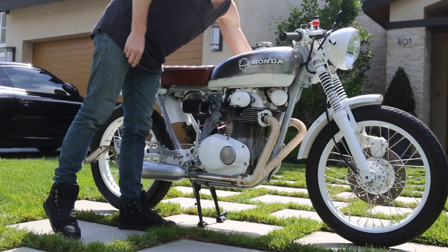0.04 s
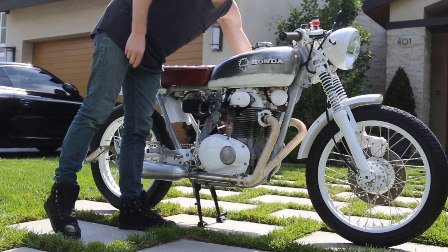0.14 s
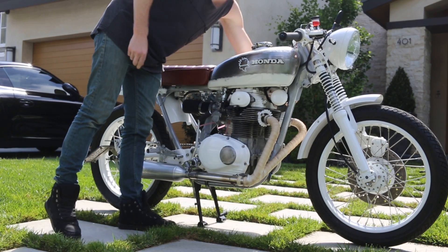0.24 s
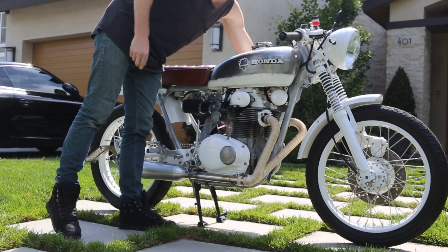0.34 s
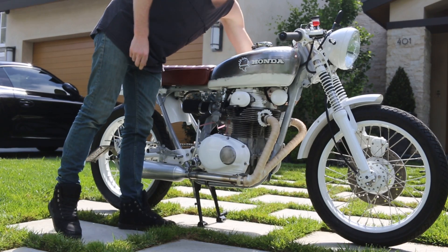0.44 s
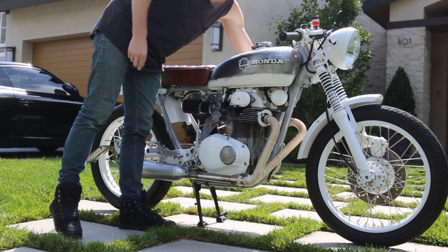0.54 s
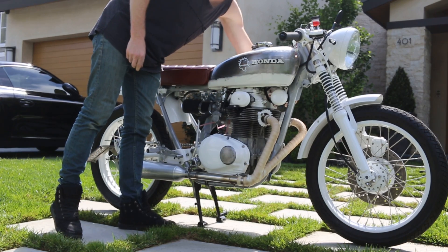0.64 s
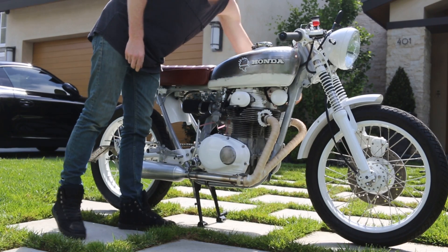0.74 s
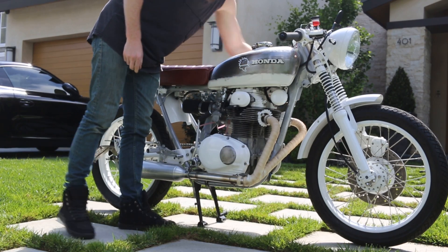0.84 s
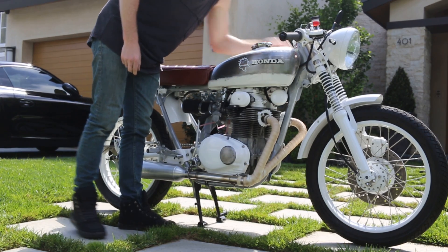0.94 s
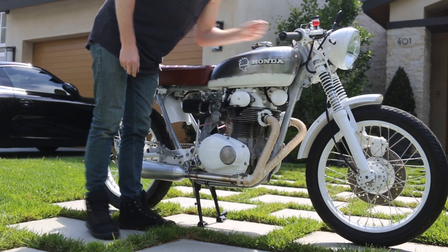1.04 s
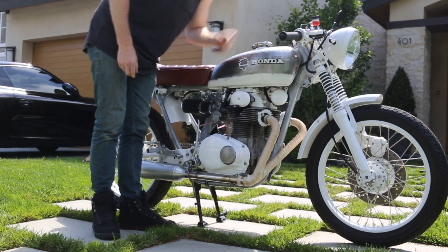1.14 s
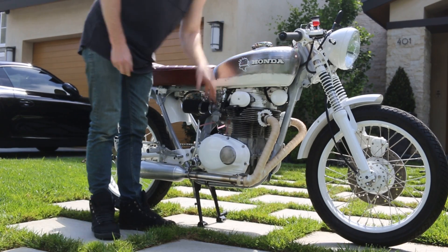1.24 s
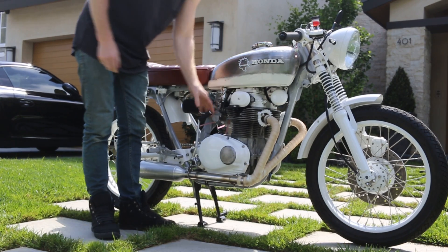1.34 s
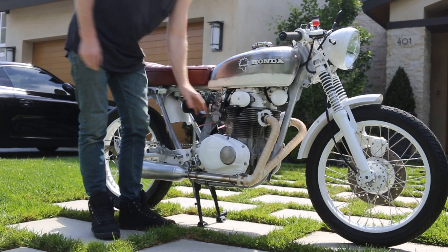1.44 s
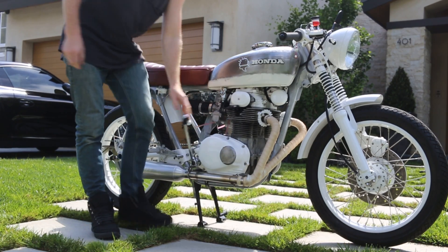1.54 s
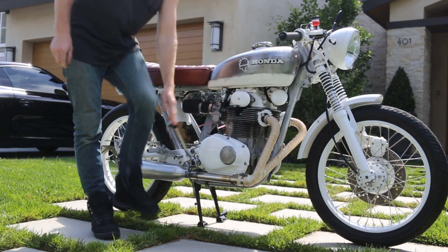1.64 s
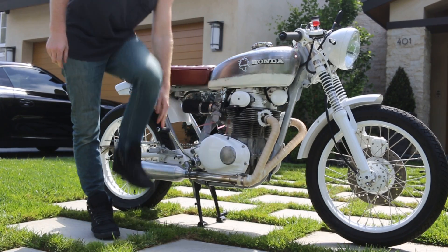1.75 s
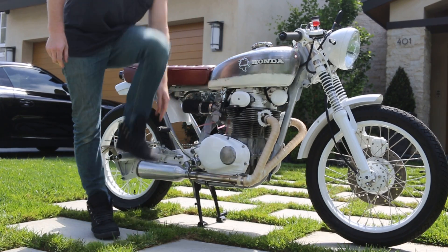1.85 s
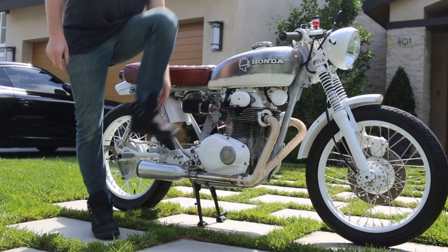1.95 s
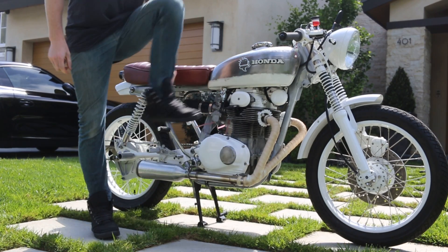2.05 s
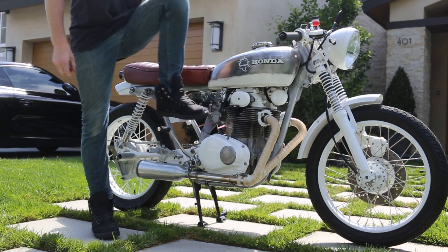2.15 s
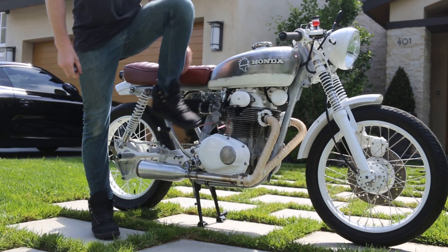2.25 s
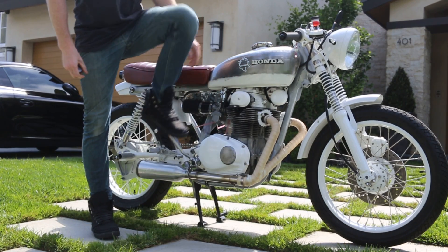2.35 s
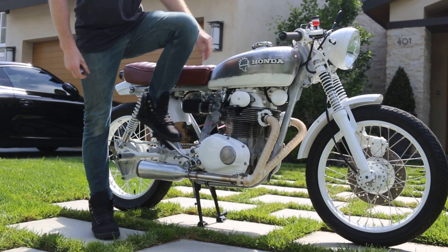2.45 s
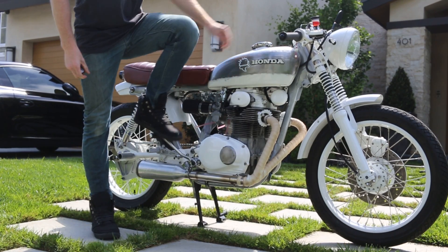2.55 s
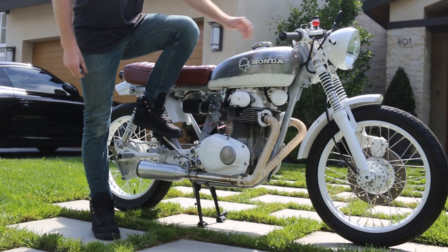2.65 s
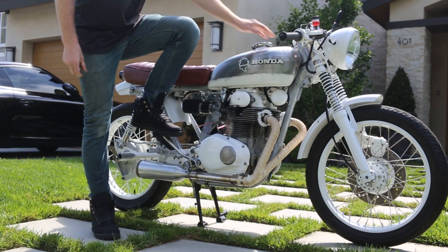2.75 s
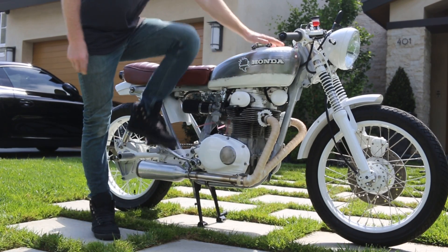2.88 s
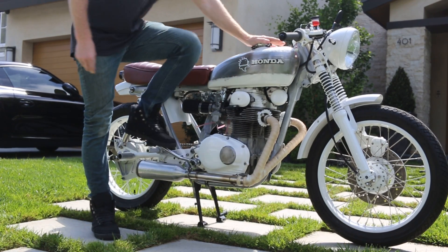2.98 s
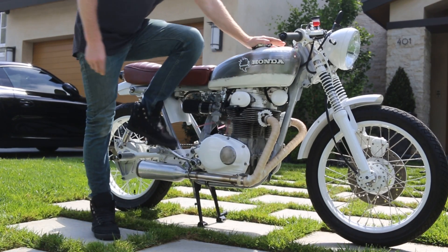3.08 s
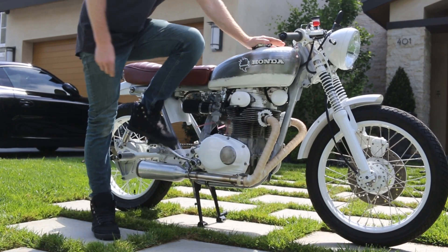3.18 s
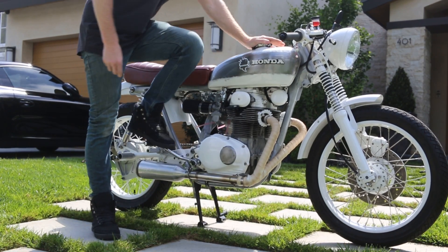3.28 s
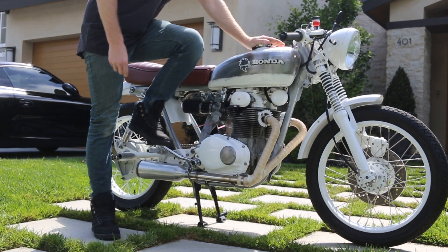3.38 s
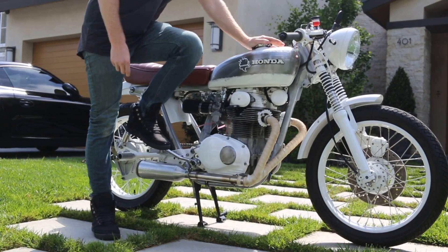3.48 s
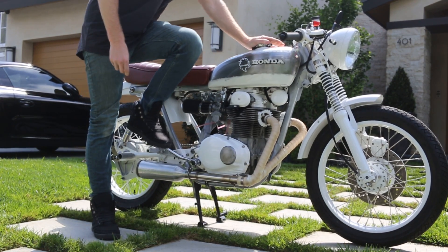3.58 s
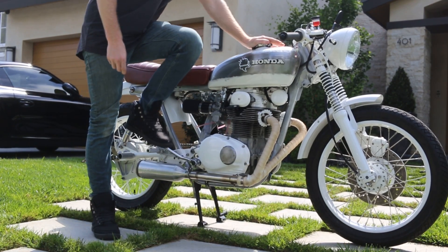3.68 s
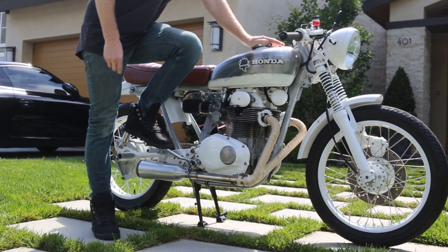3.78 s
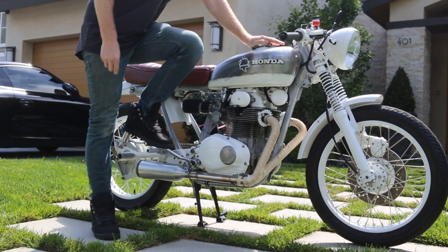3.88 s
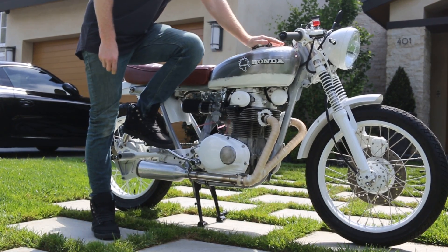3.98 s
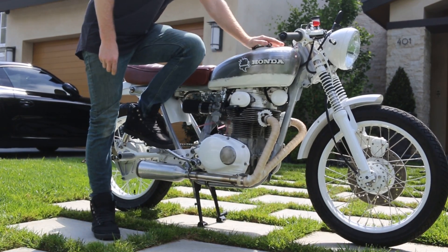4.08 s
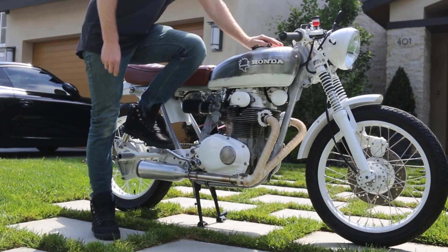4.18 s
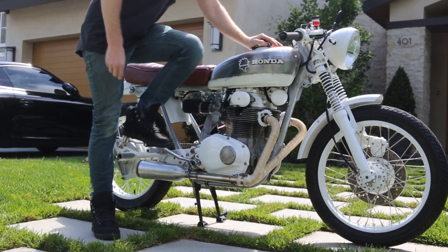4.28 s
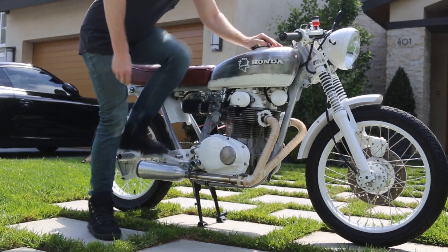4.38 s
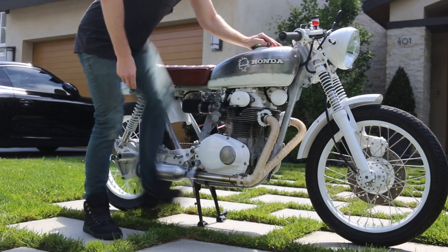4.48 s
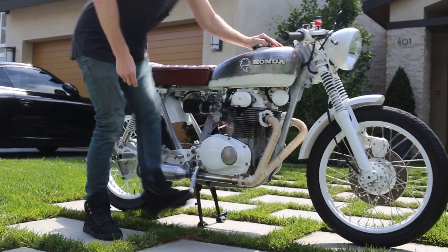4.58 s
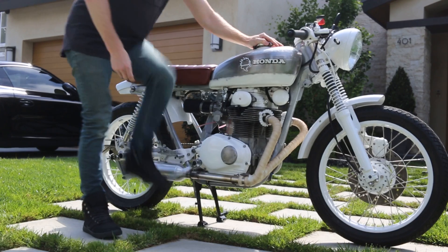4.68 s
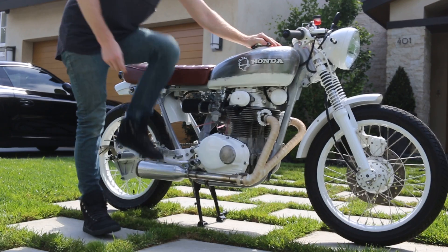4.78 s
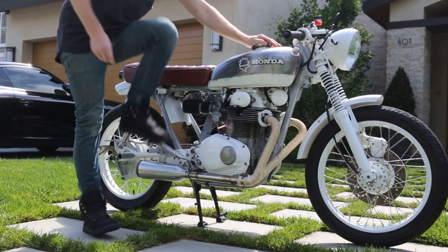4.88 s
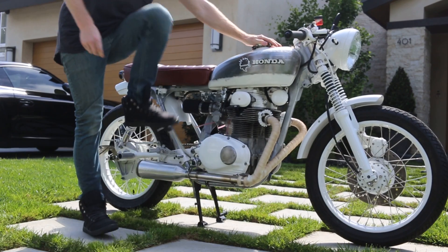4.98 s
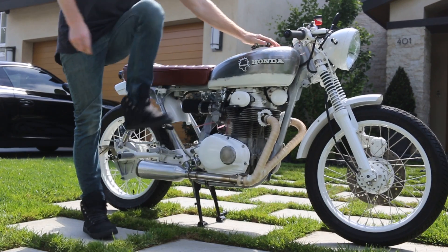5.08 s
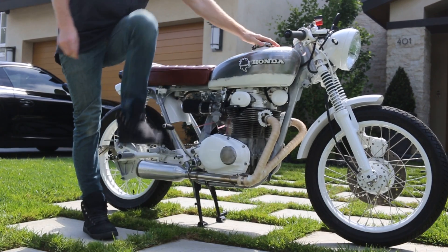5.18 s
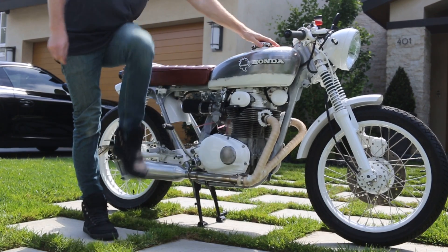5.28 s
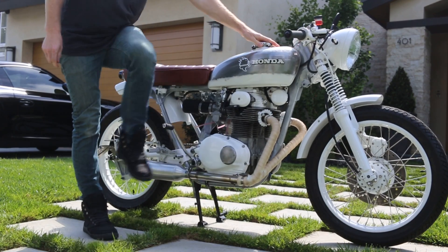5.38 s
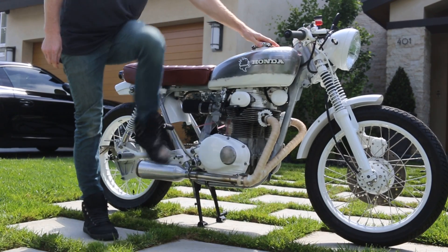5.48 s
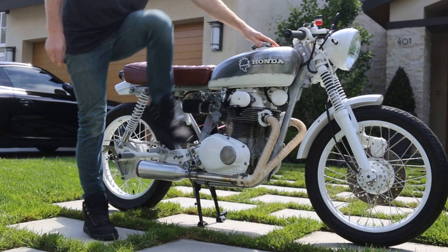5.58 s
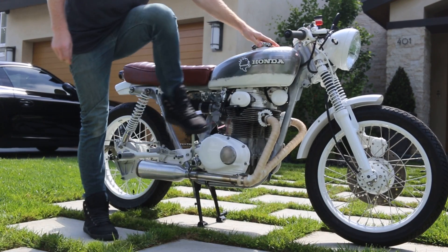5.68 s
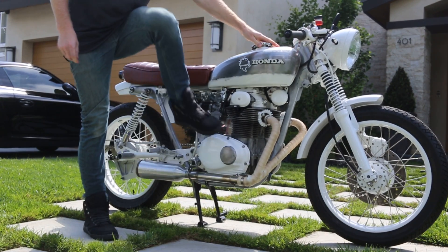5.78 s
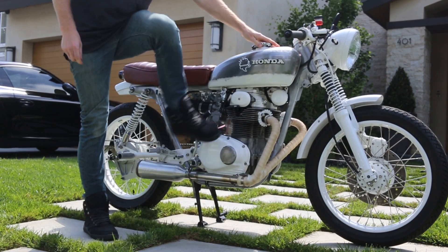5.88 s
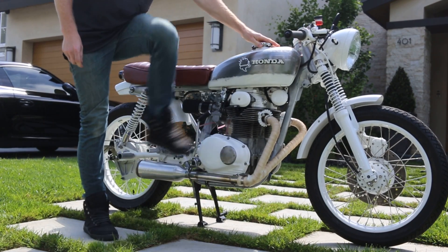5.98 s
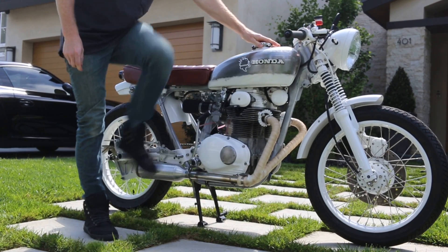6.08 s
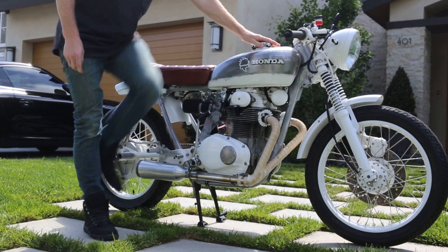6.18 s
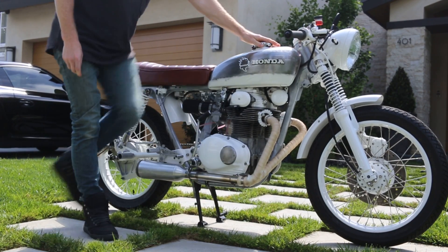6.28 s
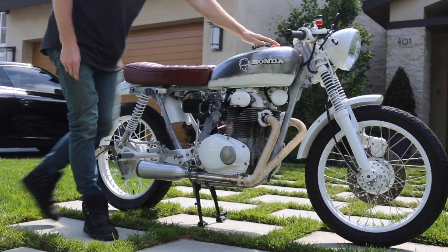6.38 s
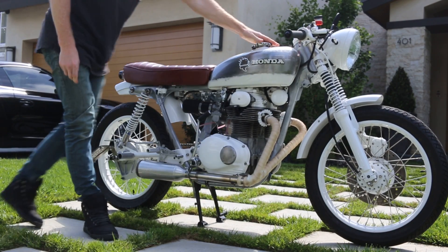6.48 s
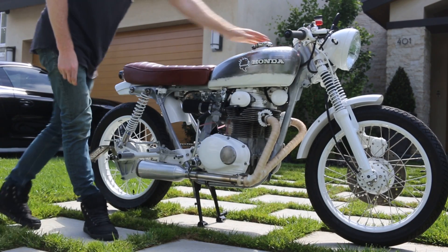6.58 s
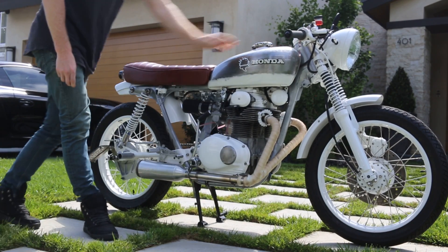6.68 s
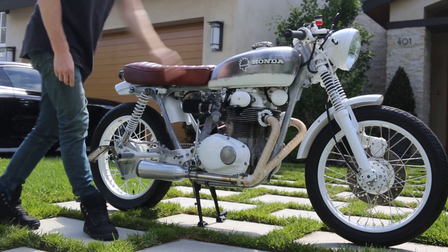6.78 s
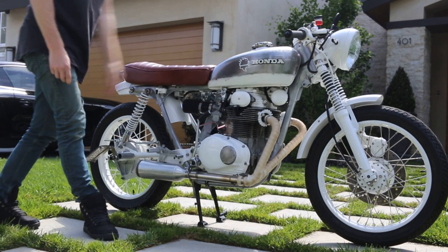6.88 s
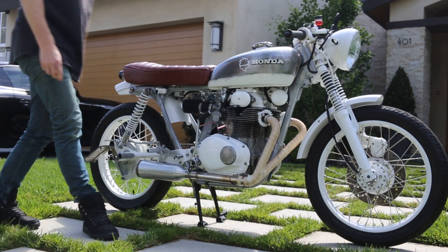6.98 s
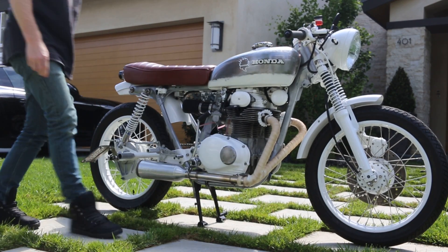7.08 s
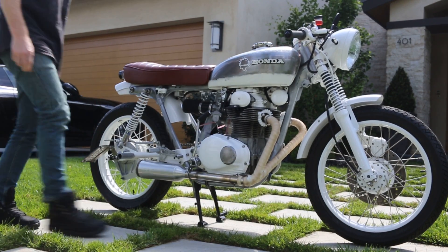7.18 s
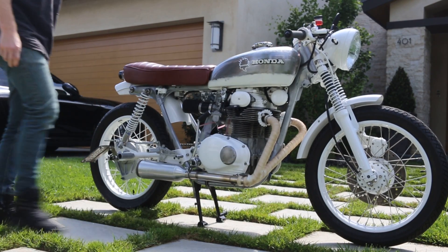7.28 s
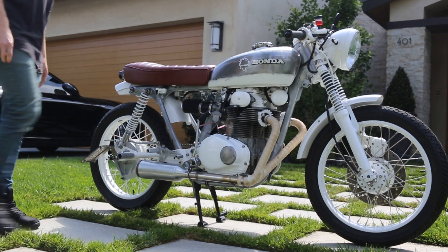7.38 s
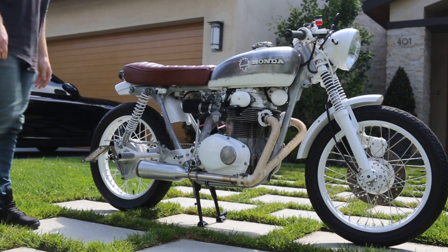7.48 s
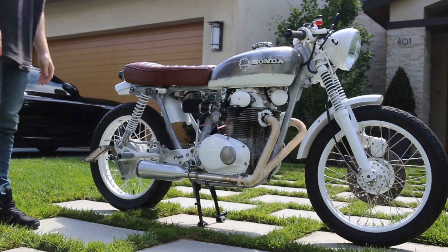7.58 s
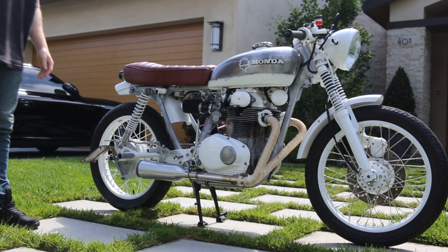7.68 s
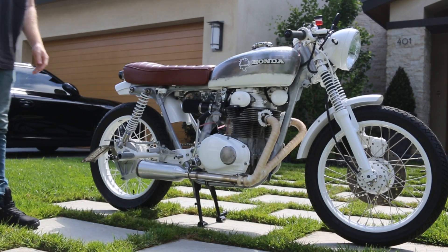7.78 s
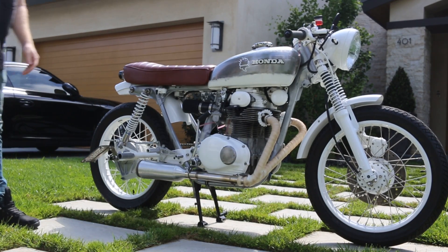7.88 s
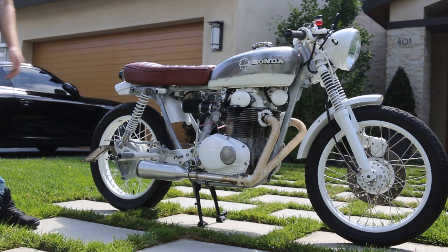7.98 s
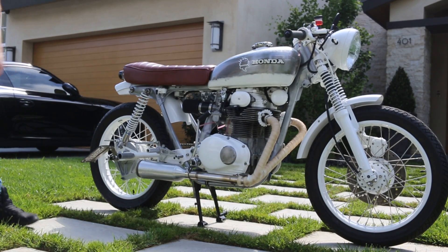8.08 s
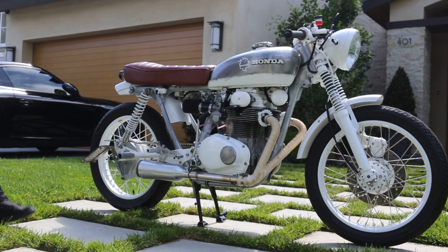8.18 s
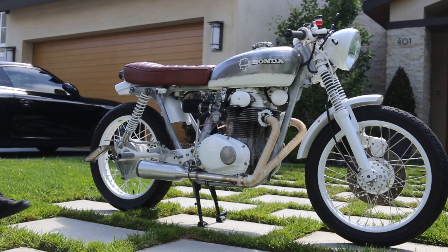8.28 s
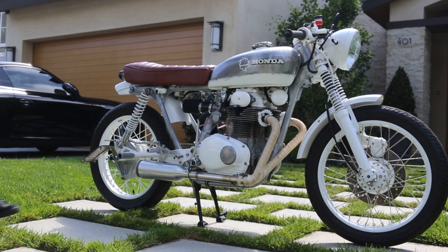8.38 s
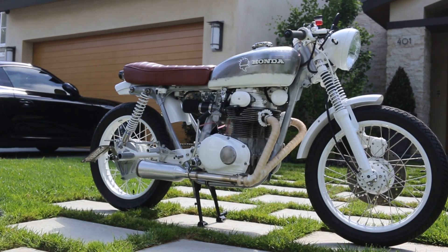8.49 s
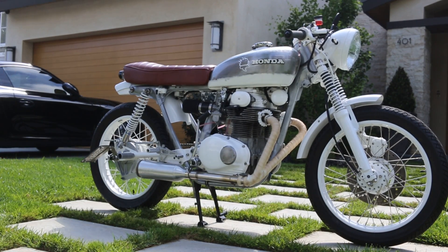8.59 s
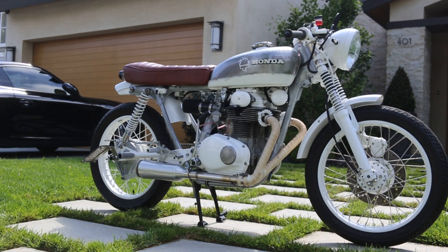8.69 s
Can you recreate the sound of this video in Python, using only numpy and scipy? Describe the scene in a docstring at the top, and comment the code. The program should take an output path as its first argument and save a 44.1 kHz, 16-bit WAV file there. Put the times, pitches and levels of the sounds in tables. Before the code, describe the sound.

Close microphone in a driveway. Over faint distant traffic and a bird whistle, a motorcycle key snaps, jeans rustle, and a metal kick lever clacks with dull low thuds. One kick sends the starter ratchet buzzing as the twin engine catches, flares briefly, then settles into a low, uneven idle with tapping valves and hissing chain until the end.

```python
"""Driveway: an old twin-cylinder motorcycle is kick started over distant traffic and a bird.
The key clicks, the lever is folded out and eased against compression: noise bursts, damped modes, low thuds.
One kick fires the engine; the starter pawl buzzes as a train of tooth snaps until the lever returns.
Then a loping idle: pulses in resonant pipes, valve knocks and gear churn, a ticking rocker, surging chain hiss."""
import sys
import numpy as np
from scipy import signal
from scipy.fft import rfft, irfft, next_fast_len
from scipy.io import wavfile
from scipy.ndimage import uniform_filter1d, map_coordinates

SR = 44100
rng = np.random.default_rng(int(sys.argv[2]) if len(sys.argv) > 2 else 0)


def generate_wav(sig):
    """Save sig (samples, or channels by samples) to the path in sys.argv[1] as 16-bit PCM at SR."""
    pcm = np.round(np.clip(np.atleast_2d(sig).T, -1, 1) * 32767).astype(np.int16)
    wavfile.write(sys.argv[1], SR, pcm)


N = 385434


def amp(db):
    """Amplitude factor of a level in dB."""
    return 10 ** (np.asarray(db) / 20)


def unit(x):
    """x scaled to rms 1."""
    return x / np.sqrt(np.mean(x ** 2) + 1e-20)


def along(points, hz):
    """(f/Hz, value) points interpolated on a log frequency axis."""
    f, v = np.transpose(points)
    return np.interp(np.log(hz + 1), np.log(f + 1), v)


def wobble(rate_hz):
    """Smooth random curve with rate_hz knots a second."""
    knots = rng.standard_normal(int(N * rate_hz / SR) + 4)
    return map_coordinates(knots, [np.arange(N) * rate_hz / SR])


def filtered(x, response):
    """x times a complex response of frequency."""
    m = next_fast_len(len(x) + SR // 2)
    return irfft(rfft(x, m) * response(np.fft.rfftfreq(m, 1 / SR)), m)[:len(x)]


def noise(spectrum, size=N):
    """Noise of rms 1, coloured by (f/Hz, level/dB) points."""
    return unit(filtered(rng.standard_normal(size), lambda hz: amp(along(spectrum, hz))))


def resonances(modes, f):
    """Causal response of (f/Hz, width/Hz, level/dB) modes with alternating signs."""
    return sum((-1) ** k * amp(db) * 1j * f * width / (centre * centre - f * f + 1j * f * width)
               for k, (centre, width, db) in enumerate(modes))


def ringing(excitation, modes):
    """Excitation coloured by resonances, at its former rms."""
    return unit(filtered(excitation, lambda f: resonances(modes, f))) * np.std(excitation)


def struck(modes):
    """Decaying sines of (f/Hz, level/dB, t60/s) modes, each at a slightly new strength."""
    t = np.arange(SR // 3) / SR
    scatter_db = rng.normal(0, 1.2, len(modes))
    return sum((-1) ** k * amp(db + scatter_db[k] - 60 * t / t60) * np.sin(2 * np.pi * hz * t)
               for k, (hz, db, t60) in enumerate(modes))


def add(track, s, sound):
    """Mix a sound into a track at time s."""
    part = track[max(round(s * SR), 0):][:len(sound)]
    part += sound[:len(part)]


def strikes(rows):
    """Envelope of sudden blows (t/s, level/dB, t60/s) that die away; their powers add."""
    power, t = np.zeros(N), np.arange(SR // 5) / SR
    for s, db, t60, *_ in rows:
        blow = amp(db - 60 * t / t60) * (1 - np.exp(-t / 0.00026))
        add(power, s, blow ** 2)
    return np.sqrt(power)


# distant traffic spectrum: f/Hz, level/dB
TRAFFIC_SPECTRUM = [(12, -34), (22, -2), (40, -4), (75, -5.5), (120, -0.5), (160, -11.5), (280, -14.5),
                    (400, -22), (550, -24), (1000, -24.5), (1600, -27.5), (4000, -34.5), (5700, -41.5),
                    (15800, -45.5)]


def traffic():
    """Distant traffic: low-weighted noise whose bass swells a little."""
    rumble = noise(TRAFFIC_SPECTRUM) * amp(-42.5)
    bass = filtered(rumble, lambda hz: 1 / (1 + (hz / 200) ** 2))
    return rumble + bass * (amp(wobble(6.3)) - 1)


# bird notes: t/s, length/s, start f/Hz, end f/Hz, level/dB
BIRD_NOTES = [(1.002, 0.11, 6800, 6600, -60), (1.14, .34, 5740, 4110, -52), (3.822, .11, 4500, 4210, -54.5),
              (3.919, 0.19, 4210, 3720, -54.5)]
SLIDE_POWER, SWELL_POWER = 2.4, 0.84  # bend of the slide, roundness of the swell
FLUTTER_SHARE = 0.0083


def bird():
    """Slightly husky whistles: swelling sines that slide down and level off, with pitch flutter."""
    track, flutter = np.zeros(N), 1 + FLUTTER_SHARE * wobble(400)
    for s, length, start_hz, end_hz, db in BIRD_NOTES:
        u = np.linspace(0, 1, round(length * SR))
        slide_hz = end_hz + (start_hz - end_hz) * (1 - u) ** SLIDE_POWER
        hz = slide_hz * flutter[round(s * SR):][:len(u)]
        swell = np.abs(np.sin(np.pi * u)) ** SWELL_POWER
        add(track, s, amp(db) * swell * np.sin(2 * np.pi * np.cumsum(hz) / SR))
    return track


# cloth spectrum: f/Hz, level/dB
JEANS_SPECTRUM = [(2350, -25), (4000, 2), (5650, -3), (8650, 3.5), (9960, 4.5), (12100, -2), (15500, -18)]
# strokes of cloth and boot: peak t/s, level/dB, rise/s, fall/s
RUB_STROKES = [(.545, -47, .025, 0.027), (1.6, -63, .05, 0.041), (2.12, -55.5, 0.26, 0.07),
               (3.0, -66, .04, 0.11), (3.42, -67, .12, .05)]


def jeans():
    """Jeans rub as the leg swings: bright noise in uneven bell-shaped strokes."""
    t = np.arange(N) / SR
    stroke = sum(amp(db) * np.exp(-.5 * ((t - s) / np.where(t < s, rise, fall)) ** 2)
                 for s, db, rise, fall in RUB_STROKES)
    return noise(JEANS_SPECTRUM) * stroke * amp(1.2 * wobble(60))


# soft thuds as the bike rocks and the pistons are eased over: t/s, level/dB, f/Hz
LOW_THUDS = [(.6, -29.5, 75), (.685, -27, 100), (0.881, -33.5, 78), (2.16, -16.5, 106), (3.949, -23.5, 109),
             (4.141, -12.5, 119), (4.156, -15, 137), (4.178, -26, 152), (4.43, -23, 111)]
# dull crankcase knocks: t/s, level/dB, t60/s
CASE_KNOCKS = [(4.146, -32, .04), (4.156, -28, 0.078), (4.5, -19, 0.11)]


def thuds():
    """Heavily damped low pushes, and dull knocks as the crank takes up its play."""
    track, t = np.zeros(N), np.arange(SR // 8) / SR
    u = t / 0.0047
    push = (u * np.exp(1 - u)) ** 2
    for s, db, hz in LOW_THUDS:
        add(track, s, -amp(db) * push * np.sin(2 * np.pi * hz * t))
    dull = noise([(100, -11), (250, 0), (400, -6), (650, -13), (1000, -30), (3000, -60)])
    return track + strikes(CASE_KNOCKS) * dull


# ignition switch snap: t/s, relative level/dB, t60/s
SWITCH_SNAP = (.4835, -1.7, 0.021)
PIN_GAP_S, PIN_DB, PIN_GROWTH_DB, PIN_T60_S = .0062, -18, 2, .045  # growth toward the snap
REBOUND_S, REBOUND_DB, REBOUND_T60_S = 0.021, -29, .018


def key_turn(pin_count=3):
    """Blows of the key: pins scrape ever louder, the switch snaps, the key rattles twice."""
    s = SWITCH_SNAP[0]
    pins = [(s - (k + 1) * PIN_GAP_S, PIN_DB - k * PIN_GROWTH_DB, PIN_T60_S) for k in range(pin_count)]
    rebounds = [(s + k * REBOUND_S, REBOUND_DB, REBOUND_T60_S) for k in (1, 2)]
    return pins + [SWITCH_SNAP] + rebounds


# key and lever noise spectra: f/Hz, relative level/dB
KEY_SPECTRUM = [(250, -50), (450, -34), (900, -15), (2300, -22.5), (2900, -10.5), (4200, -18), (4900, -10),
                (6800, -16), (8000, -4.5), (10200, -3.5), (12500, -21), (16000, -28)]
LEVER_SPECTRUM = [(150, -47), (250, 1.5), (631, -2.5), (774, -6), (1050, -7), (1410, 0.5), (1590, -5),
                  (2020, -15.5), (2480, -9), (2900, -8), (4150, -45), (8520, -43), (15000, -59)]
# bright snaps of key and catches: t/s, relative level/dB, t60/s
CATCH_SNAPS = [(.069, -39, 0.093), (.099, -36.5, 0.056), (1.12, -44, .06), (1.784, -36, 0.023),
               (3.26, -42, .03), (5.814, -7.5, 0.015)]
# kick lever and boot contacts: t/s, relative level/dB, t60/s, ring f/Hz
LEVER_CLACKS = [(1.785, -31.5, 0.063, 2500), (2.391, -35, 0.096, 1490), (2.448, -35.5, .05, 2730),
                (2.925, -30, 0.069, 2660), (2.945, -26.5, 0.11, 930), (2.955, -28.5, 0.11, 438),
                (3.002, -34, 0.044, 2980), (3.092, -36.5, 0.083, 1100), (3.122, -33, 0.059, 3720),
                (3.261, -32, 0.059, 2650), (3.266, -32, 0.13, 600), (3.677, -11, 0.044, 1930),
                (3.744, -33, 0.1, 1077), (4.474, -27.5, 0.088, 1250), (4.497, -17.5, 0.11, 2460),
                (4.511, -9, 0.098, 1350), (4.606, -13, 0.054, 2670), (5.814, -24.5, 0.086, 4500)]
# steel kick lever modes: f/Hz, relative level/dB, t60/s
LEVER_MODES = [(453, -11, 0.14), (930, -3, 0.12), (1077, 2, 0.16), (1583, -1, 0.086), (1860, 4, 0.029),
               (2120, 3, 0.044), (2380, -5, 0.04), (2850, -4, 0.038), (3620, -5.5, 0.038)]


def controls():
    """Key snaps and lever clacks: noise bursts; each clack also rattles a part and rings the steel lever."""
    ring, t = np.zeros(N), np.arange(SR // 5) / SR
    for s, db, t60, hz in LEVER_CLACKS:
        rattle = ringing(rng.standard_normal(len(t)), [(hz, hz / 6, 0)])
        add(ring, s, amp(db - 9.5 - 60 * t / t60) * rattle)
        add(ring, s, amp(db - 19) * struck(LEVER_MODES))
    clacks = amp(-10.5) * noise(LEVER_SPECTRUM) * strikes(LEVER_CLACKS)
    snaps = amp(-8.5) * noise(KEY_SPECTRUM) * strikes(CATCH_SNAPS + key_turn())
    return ring + clacks + snaps


RATCHET_START_S, TOOTH_S = 4.596, .010835
EASE_AFTER_TEETH, TOOTH_STRETCH_S = 13.87, .000286  # later gaps each grow by the stretch
TOOTH_DB, TOOTH_FADE_DB, TOOTH_SCATTER_DB = -7, 0.28, 1.5  # relative level, loss per tooth, chance
BITE_DB, BITE_TEETH = 12, 0.59  # softer start, over within a tooth or two


def teeth(count=33):
    """(t/s, level/dB) of the teeth: evenly spaced, then slower; softening as the lever comes back."""
    k = np.arange(count)
    gaps = TOOTH_S + TOOTH_STRETCH_S * np.maximum(k - EASE_AFTER_TEETH, 0)
    db = TOOTH_DB - TOOTH_FADE_DB * k - BITE_DB * np.exp(-k / BITE_TEETH)
    db = db + rng.normal(0, TOOTH_SCATTER_DB, count)
    s = RATCHET_START_S + np.cumsum(gaps) - gaps + rng.normal(0, 0.00034, count)
    return list(zip(s, db))


# the engine throws off the pawl: t/s, relative level/dB
PAWL_THROW = (4.526, -7.5)
# pawl noise spectrum: f/Hz, relative level/dB
PAWL_SPECTRUM = [(470, -38), (800, -17), (907, 2), (990, -29), (1260, -19), (2150, -3), (2630, -7.5),
                 (5640, -9), (9310, -3.5), (12100, -11), (16000, -37)]
# ratchet wheel resonances: f/Hz, width/Hz, relative level/dB
WHEEL_MODES = [(2670, 220, 8.5), (3410, 230, 4.5), (4030, 640, 2), (5100, 310, -19), (7900, 400, -6),
               (9040, 450, -14), (10400, 410, -9), (11900, 350, -10)]


def ratchet():
    """The starter pawl snaps over its teeth as short noise bursts; longer ones ring the wheel."""
    blows = [PAWL_THROW] + teeth()
    snap = strikes([(s, db, .015) for s, db in blows])
    rattle = strikes([(s, db, .035) for s, db in blows])
    wheel = ringing(rattle * rng.standard_normal(N), WHEEL_MODES)
    return amp(-5.0) * noise(PAWL_SPECTRUM) * snap + amp(-12.0) * wheel


# crank speed, spun up by the kick, brief flare, idle: t/s, speed/rpm
CRANK_SPEED = [(4.3, 0.0), (4.6, 1541.0), (4.66, 1274.0), (4.95, 1175.0), (6.05, 1225.0), (6.3, 1190.0),
               (6.75, 1236.0), (7.8, 1220.0), (8.05, 1195.0), (8.7, 1227.0)]
FIRST_FIRING_S = 4.525


def crank_rpm():
    """Crank speed at every sample."""
    s, rpm = np.transpose(CRANK_SPEED)
    return np.interp(np.arange(N) / SR, s, rpm)


def crank():
    """Four-stroke cycles (two crank turns each) completed since the first firing."""
    cycles = np.cumsum(crank_rpm() / 60 / 2) / SR
    return cycles - cycles[round(FIRST_FIRING_S * SR)]


def cycle_times(place):
    """Times at which the engine passes one place of its cycle."""
    cycles = crank()
    return np.interp(np.arange(place, cycles[-1], 1), cycles, np.arange(N) / SR)


IDLE_RPM, SPEED_POWER = 1210, 1.06  # mechanical noise grows as speed to this power
# starter gear in mesh: start t/s, end t/s
STARTER_MESH = (4.472, 5.0)


def works_gain(idle_db, starter_db, unfired_db):
    """Mechanical noise follows crank speed, offset before the catch and while the starter is in mesh."""
    t = np.arange(N) / SR
    step_db = np.select([t < STARTER_MESH[0], t < STARTER_MESH[1]], [unfired_db, starter_db], 0.)
    load_db = uniform_filter1d(step_db, size=SR // 50)
    return (crank_rpm() / IDLE_RPM) ** SPEED_POWER * amp(idle_db + load_db)


# surges of gas and chain hiss: place/cycle, width/cycle, relative level/dB
HISS_SURGES = [(.06, 0.059, 5.5), (.36, 0.048, 1.5), (.56, .04, -1), (.81, 0.076, 1.5)]
# chain hiss spectrum: f/Hz, relative level/dB
CHAIN_SPECTRUM = [(1470, -24), (2500, 0.5), (3400, -9), (4000, -20), (4290, -14.5), (5240, -9),
                  (6760, -8.5), (8080, -9), (8790, -8), (9870, -6.5), (12700, -12.5), (14000, -18),
                  (15800, -31)]
# thin engine cover resonances: f/Hz, width/Hz, relative level/dB
COVER_MODES = [(3880, 120, 3), (5320, 52, 2), (5760, 51, 3.5), (6600, 96, -10), (7300, 91, 2),
               (8210, 78, 6.5), (8740, 44, -4), (9240, 74, 0.5), (9650, 370, -1), (10830, 250, -5),
               (12160, 170, -1.5), (12400, 130, -20)]
CHAIN_DB, STARTER_CHAIN_DB, UNFIRED_CHAIN_DB = -41, 2.3, -7.5  # idle gain, then offsets from it


def chain():
    """Gas and cam chain hiss surges with each valve event; the links flutter, tick and ring the covers."""
    cycles = crank()
    surge = sum(amp(db) * np.exp(-.5 * (((cycles - place + .5) % 1 - .5) / width) ** 2)
                for place, width, db in HISS_SURGES)
    links = unit((1.33 + surge) * amp(1.64 * wobble(600) + 0.93 * wobble(60)))
    ticks = unit((rng.random(N) < 400 / SR) * rng.standard_normal(N))  # about 400 a second
    rough = links * (rng.standard_normal(N) + 0.32 * ticks)
    sputter = unit(filtered(rough, lambda hz: amp(along(CHAIN_SPECTRUM, hz))))
    covers = ringing(links * rng.standard_normal(N), COVER_MODES)
    hiss = amp(-1.5) * sputter + amp(-7) * covers
    return works_gain(CHAIN_DB, STARTER_CHAIN_DB, UNFIRED_CHAIN_DB) * hiss


# loose rocker arm modes: f/Hz, relative level/dB, t60/s
ROCKER_MODES = [(1697, -4, .04), (1942, -0.5, 0.036), (2100, -11, 0.02), (2610, -20, .035),
                (3236, -13, 0.033)]
# its valve and seat modes: f/Hz, relative level/dB, t60/s
SEAT_MODES = [(1293, -4.5, 0.051), (1470, -3, 0.043), (1630, -19, 0.027)]
# two ticks a cycle: place/cycle, relative level/dB
ROCKER_TICKS = [(.472, 0), (.815, -3)]
TICK_DB, TICK_FADE_DB_PER_S = -26.5, 1.24  # quietens as oil reaches it


def loose_tappet():
    """One valve has too much clearance: its rocker ticks, and the lower valve seat answers 3 ms later."""
    track, t = np.zeros(N), np.arange(SR // 3) / SR
    crack_spectrum = [(600, -23), (1300, 6), (2200, -3.0), (3500, -5.0), (6000, -28)]
    for place, db in ROCKER_TICKS:
        for s in cycle_times(place):
            crack = noise(crack_spectrum, size=len(t)) * amp(-60 * t / 0.04)
            scatter_db, late = rng.normal(0, [1.3, .0009])
            fade_db = TICK_FADE_DB_PER_S * (s - FIRST_FIRING_S)
            size = amp(TICK_DB + db - fade_db + scatter_db)
            add(track, s + late, size * (struck(ROCKER_MODES) + 0.74 * crack))
            add(track, s + late + 0.00305, size * struck(SEAT_MODES))
    return track


# valve gear knocks: place/cycle, relative level/dB, t60/s
TAPPET_KNOCKS = [(0.051, 0, 0.068), (.5, -7.5, 0.14), (.6, -4, 0.1), (.85, 1.5, 0.035)]
# crankcase and fin resonances: f/Hz, width/Hz, relative level/dB
CASE_MODES = [(886, 24, 3.5), (1273, 98, 5), (1714, 95, -3), (1912, 63, -0.5), (2570, 216, -7.5),
              (3880, 130, -16), (4500, 60, -21)]
# gear churn spectrum: f/Hz, relative level/dB
CHURN_SPECTRUM = [(240, -16), (400, -1.5), (445, -1), (489, -7.5), (770, -7.5), (874, -12.5), (972, -9),
                  (1280, -8.5), (1580, -10), (1950, -11.5), (2170, -16), (2540, -24.5), (5000, -21.5),
                  (6500, -36), (11000, -120)]
# the engine catches with a knock: t/s, relative level/dB
CATCH_KNOCK = (4.511, -24.5)
# cooling fin modes: f/Hz, relative level/dB, t60/s
FIN_MODES = [(910, -0.5, 0.34), (1273, 1, 0.08)]
CLATTER_DB, STARTER_CLATTER_DB, UNFIRED_CLATTER_DB = -35.5, 3.5, -0.5  # idle gain, then offsets from it


def valve_gear():
    """Tappets knock on the cases at fixed places of the cycle, over gear churn and singing fins."""
    knocks = [(s + rng.normal(0, .0006), db + rng.normal(0, 1.2), t60)
              for place, db, t60 in TAPPET_KNOCKS for s in cycle_times(place)]
    ring = ringing(unit(strikes(knocks) * rng.standard_normal(N)), CASE_MODES) * amp(-7.0)
    load_db = 1.7 * np.cos(2 * np.pi * (crank() + 0.027))  # gears loaded most around the firings
    churn = noise(CHURN_SPECTRUM) * amp(-4 + load_db + 0.47 * wobble(120))
    fins = noise([(800, -45), (880, -8), (899, 1), (918, -11.5), (1000, -58)]) * amp(-14.5)
    gear = works_gain(CLATTER_DB, STARTER_CLATTER_DB, UNFIRED_CLATTER_DB) * (ring + churn + fins)
    add(gear, CATCH_KNOCK[0], amp(CATCH_KNOCK[1]) * struck(FIN_MODES))
    return gear


FLARE_DB, FLARE_S = 7.5, 0.066  # first firings stronger, decay time constant
SETTLE_DB_PER_S = 0.44
COLD_LOPE_DB, COLD_UNTIL_S = 1.16, 6.7


def firings(place, scatter_db):
    """Times and levels/dB of one pulse a cycle: flare, slow settling; while cold, every other one is weak."""
    s = cycle_times(place)
    age = np.maximum(s - FIRST_FIRING_S, 0)
    weak = (np.arange(len(s)) % 2 == 0) & (s < COLD_UNTIL_S)
    effort_db = FLARE_DB * np.exp(-age / FLARE_S) - SETTLE_DB_PER_S * age - COLD_LOPE_DB * weak
    late, uneven_db = rng.normal(0, [0.00033, scatter_db], (len(s), 2)).T
    return s + late, effort_db + uneven_db


def pipe(place, modes, gain_db, muffler_hz, misfires=()):
    """One pressure pulse a cycle, weak on a misfire, rings a pipe and is rounded off by the muffler."""
    pulses = np.zeros(N)
    times, levels_db = firings(place, scatter_db=0.63)
    for s, db in misfires:
        levels_db[np.argmin(np.abs(times - s))] += db
    for s, db in zip(times, levels_db):
        add(pulses, s, amp([db + gain_db]))  # one-sample pulse

    def response(f):
        muffler = 1 + np.sqrt(2) * 1j * f / muffler_hz - (f / muffler_hz) ** 2
        return resonances(modes, f) / muffler
    return filtered(pulses, response)


# exhaust pipe resonances: f/Hz, width/Hz, relative level/dB
FAR_PIPE_MODES = [(122, 53, -3.5), (183.9, 36.3, 1.5), (198, 33.8, -3)]
NEAR_PIPE_MODES = [(97.5, 37, -6), (187, 74, -4.5), (204.6, 12.8, -3)]
# far cylinder stumbles: t/s, level change/dB
FAR_MISFIRES = [(4.88, -3), (6.08, -5.5), (6.67, -10)]
# reflections from ground, car and house: delay/s, share
WALL_REFLECTIONS = [(.004, .43), (0.014, 0.25), (0.0589, .11)]


def exhaust():
    """The cylinders fire about half a crank turn apart, then rest; the intakes gulp in the pause."""
    far = pipe(-.233, FAR_PIPE_MODES, gain_db=45.5, muffler_hz=330, misfires=FAR_MISFIRES)
    near = pipe(0, NEAR_PIPE_MODES, gain_db=46.5, muffler_hz=340)
    intake_modes = [(186.6, 4.2, 0.5), (250, 8.4, -2.5), (284.7, 27.0, -4.0), (339.8, 12.1, 5.5),
                    (455, 13, -19.0)]
    intake = pipe(0.21, intake_modes, gain_db=29.5, muffler_hz=447)

    def reflections(f):
        return 1 + sum(share * np.exp(-2j * np.pi * f * delay) for delay, share in WALL_REFLECTIONS)
    return filtered(far + near + intake, reflections)


def echo(x, decay):
    """Diffuse answer of house fronts and hedges: a noise tail dying by (f/Hz, t60/s) points."""
    hz, t, z = signal.stft(rng.standard_normal(SR // 2), SR, nperseg=256)
    fade = amp(-60 * t / along(decay, hz)[:, None])
    tail = signal.istft(z * fade, SR, nperseg=256)[1]
    delayed = np.pad(tail, (SR // 80, 0))
    return signal.fftconvolve(x, delayed / np.linalg.norm(tail))[:N]


# echo decays around motorcycle and bird: f/Hz, t60/s
YARD_DECAY = [(100, 0.39), (1000, 0.77), (4000, 0.17), (12000, 0.11)]
STREET_DECAY = [(1000, .9), (4000, 0.88), (8000, 0.37)]


def scene():
    """The motorcycle close by in its yard, the bird and the traffic farther off."""
    whistle, pipes = bird(), exhaust()
    metal = controls() + ratchet() + chain() + loose_tappet() + valve_gear()
    yard = echo(amp(-20.0) * pipes + amp(-17.5) * metal, YARD_DECAY)
    street = amp(-3) * echo(whistle, STREET_DECAY)
    return (traffic() + whistle + jeans() + thuds() + metal + pipes + yard + street)[None]


TOP_HZ = 15850


def record(dry):
    """The microphone thins the lowest bass, peaks clip at full scale, and a band limit cuts the top."""
    thinned = filtered(dry[0], lambda hz: amp(along([(20, -7.0), (38, -16.5), (52, 0)], hz)))
    return filtered(np.clip(thinned, -1, 1), lambda hz: hz < TOP_HZ)[None]


dry = scene()
out = record(dry)
generate_wav(out)
```